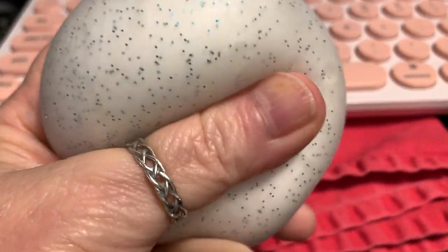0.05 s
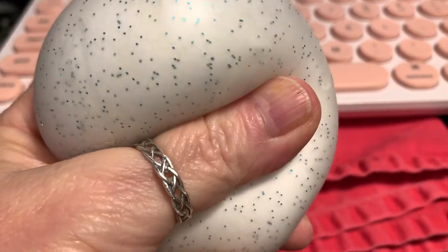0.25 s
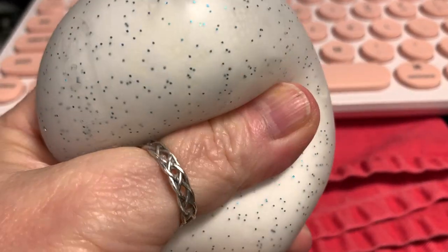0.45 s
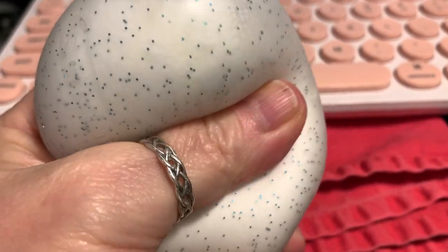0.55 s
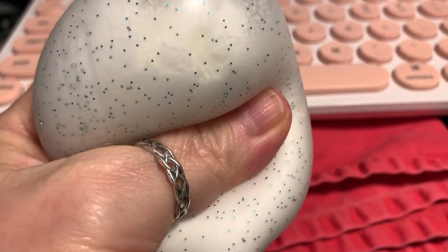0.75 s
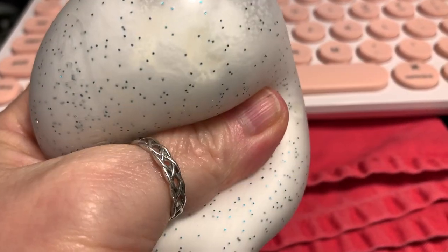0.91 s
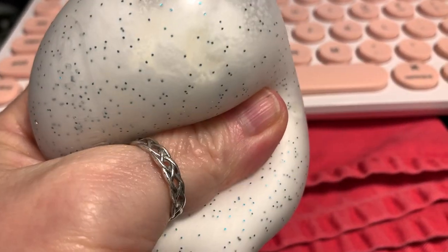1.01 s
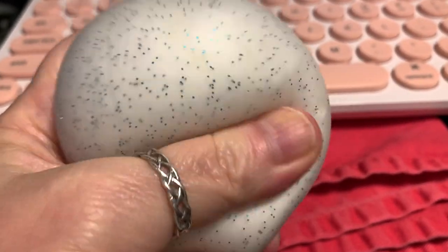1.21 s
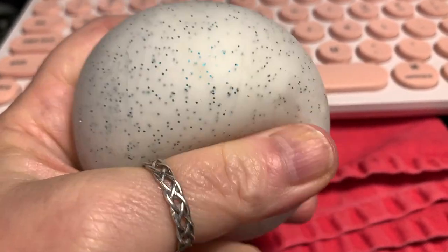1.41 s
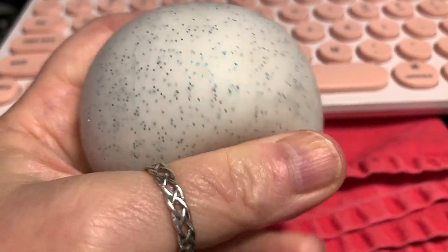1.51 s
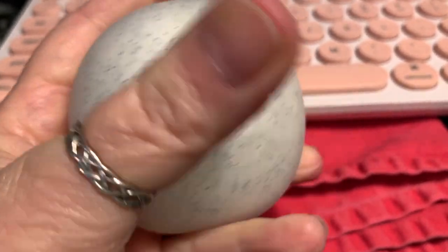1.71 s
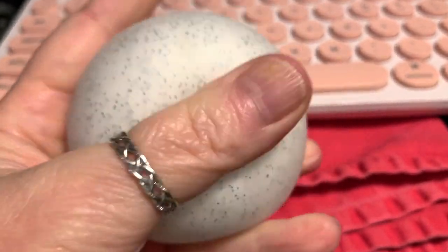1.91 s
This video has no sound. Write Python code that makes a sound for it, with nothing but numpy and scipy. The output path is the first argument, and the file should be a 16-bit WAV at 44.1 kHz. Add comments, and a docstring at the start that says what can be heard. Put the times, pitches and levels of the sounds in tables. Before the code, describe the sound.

A soft rubber stress ball squeezed very close to the microphone in a quiet room: faint rubbing grows into a dense sticky crunch, then a gentle rustle as it swells back, and a low plop.

```python
"""Rubber rubs softly under a thumb in a quiet room: a stress ball, squeezed close to the microphone.
The rub is dense friction grains; then the skin sticks and slips in a crunching run, each slip a flurry
of snaps that the skin smears into a falling chirp. The ball swells back with a soft rustle, the thumb
peels off with a noise tick and a low plop, and the fingers shift. Shaped noise makes the room's rumble and hiss."""
import sys
import numpy as np
from scipy import signal
from scipy.fft import rfft, irfft
from scipy.io import wavfile

SR = 44100
rng = np.random.default_rng(int(sys.argv[2]) if len(sys.argv) > 2 else 0)


def int16_out(signal):
    """Quantize to a 16-bit WAV file."""
    q = np.round(np.clip(np.atleast_2d(signal).T, -1, 1) * 32767)
    wavfile.write(sys.argv[1], SR, q.astype(np.int16))


N = 85995
TIME = np.arange(N) / SR
BLOCK, LEAD_IN = 4096, 256  # samples: length of one short sound, and room before its first snap
BLOCK_TIME = np.arange(BLOCK) / SR
LEVEL_WINDOW_S = 0.01  # a short sound's level counts its energy as if spread over this time


def from_db(db):
    """Decibels to gain."""
    return 10 ** (np.asarray(db) / 20)


def rms_one(x):
    """Scale to unit rms."""
    return x / np.sqrt(np.mean(x ** 2) + 1e-20)


def bins(size):
    """Frequencies of a spectrum [Hz], kept above zero for the logarithm."""
    return np.maximum(np.fft.rfftfreq(size, 1 / SR), 1)


def at_hz(points, hz, axis=1):
    """Read one column of a table on a log-frequency axis."""
    table = np.array(points)
    return np.interp(np.log(hz), np.log(table[:, 0]), table[:, axis])


def colour(x, points, pitch=1):
    """Filter by a spectral curve shifted by a pitch ratio; unit rms."""
    size = x.shape[-1]
    gain = from_db(at_hz(points, bins(size) / pitch))
    return rms_one(irfft(rfft(x) * gain, size))


def high_pass(x, hz, order=2):
    """Remove the bass."""
    return signal.sosfilt(signal.butter(order, hz, "high", fs=SR, output="sos"), x)


def resonate(x, hz, q):
    """Pass through one resonance."""
    return signal.lfilter(*signal.iirpeak(hz, q, fs=SR), x)


def snaps(size, per_s, spread_db):
    """Tiny clicks at random moments, with random sign and uneven size."""
    hits = rng.random(size) < per_s / SR
    signs = rng.choice([-1, 1], size)
    sizes = from_db(spread_db * np.clip(rng.standard_normal(size), -2, 2))
    return hits * signs * sizes


def reflections(x, t60, low_hz):
    """A dying cloud of reflections, different on each side."""
    size = len(x)
    cloud = rng.standard_normal((2, size)) * from_db(-60 * TIME[:size] / t60)
    cloud /= np.sqrt(np.sum(cloud ** 2, axis=1, keepdims=True))
    return signal.fftconvolve(high_pass(x, low_hz)[None], cloud, axes=1)[:, :size]


# tone of the room's rumble and hiss: (frequency [Hz], relative level [dB])
ROOM_TONE = [(25, -7), (42, 3.5), (62, -0.5), (120, 3.5), (180, -6.5), (500, -14), (1000, -25.5),
             (7000, -38), (9300, -28.5), (11600, -42), (13600, -33.5), (16000, -38)]
ROOM_TONE_DB = -59.5  # rms of each stream before the high-pass and the ports


def room_tone():
    """Three independent noise streams: one for the ports, and a left and right pair without bass."""
    air = from_db(ROOM_TONE_DB) * colour(rng.standard_normal((3, N)), ROOM_TONE)
    return ports(air[0]) + high_pass(air[1:], hz=810)


def room_echo(x):
    """The room's faint, quickly dying reverberation."""
    return from_db(-36) * reflections(x, t60=0.19, low_hz=250)


def scattered(x):
    """Reflections off hand and desk: a fresh short cloud, left and right, for each sound given."""
    return from_db(-7) * reflections(x, t60=0.01, low_hz=750)


TRAVEL_S, TRAVEL_POWER = 0.0032, 0.6695  # delay of a 1 kHz skin wave; how steeply lower waves slow


def through_skin(x, travel_s):
    """Bending waves: the treble arrives first and the bass trails, so a click becomes a falling chirp."""
    size = x.shape[-1]
    delay = travel_s * (1000 / np.maximum(bins(size), 60)) ** TRAVEL_POWER
    delay = delay - delay[-1] / 2  # take off half the delay of the highest treble
    phase = 2 * np.pi * np.cumsum(delay) * SR / size  # delay summed over frequency gives phase
    return irfft(rfft(x) * np.exp(-1j * phase), size)


# the two voices of the rubbing: (frequency [Hz], relative level [dB])
MURMUR = [(40, -21.5), (170, -4), (330, 3), (550, 1.5), (950, -5), (1150, -18), (1400, -7.5), (1900, -23.5),
          (4000, -73.5)]
RUSTLE = [(600, -9), (1500, 9), (2500, -0.5), (3400, -0.5), (4800, -7), (6500, -9), (9500, -16),
          (11500, -22), (14000, -21.5), (16000, -30)]
# strokes of hand on rubber in the squeeze, the release and the finger shift:
# (time [s], murmur level [dB], rustle level [dB])
PRESS_RUB = [(.04, -65.5, -106), (.095, -53, -86), (.19, -41, -65.5), (.25, -35.5, -51.5), (.335, -47, -60),
             (.37, -43.5, -50), (.47, -44.5, -50.5), (.63, -41.5, -44), (.69, -33, -37), (.74, -43.5, -36),
             (.79, -51.5, -47.5), (.85, -61.5, -65.5)]
RELEASE_RUB = [(1.05, -102, -81), (1.094, -55, -56), (1.162, -41.5, -49.5), (1.205, -44, -49),
               (1.25, -58.5, -64), (1.325, -56, -63.5), (1.41, -79, -93)]
FINGER_RUB = [(1.65, -58, -84), (1.685, -51.5, -85), (1.76, -76, -99)]
PRESS_PITCH, RELEASE_PITCH, FINGER_PITCH = 0.97, 1.24, 0.483  # shift of the murmur's tone
RUB_GRAINS_PER_S, GRAIN_SPREAD_DB = 4000, 2
GRIT_PER_S, GRIT_SPREAD_DB = 1400, 3.5  # the rustle crackles in fewer, more separate grains
FLUTTER_DB, FLUTTER_PER_S = 1.47, 70  # spread and rate of the random unevenness
LIGHT_DB, FIRM_DB, LIGHT_PITCH = -49.5, -38, 0.85  # a light touch murmurs duller than a firm one


def rubbing(stroke, pitch):
    """Dense, fluttering friction grains from two patches of skin under the sliding hand."""
    s, *levels = np.transpose(stroke)
    murmur_db, rustle_db = (np.interp(TIME, s, db, left=-np.inf, right=-np.inf) for db in levels)
    firm = np.interp(murmur_db, [LIGHT_DB, FIRM_DB], [0, 1])
    wander = np.interp(TIME * FLUTTER_PER_S, np.arange(BLOCK), rng.standard_normal(BLOCK))
    flutter = from_db(FLUTTER_DB * wander)
    grains = snaps((2, N), RUB_GRAINS_PER_S, GRAIN_SPREAD_DB) * flutter
    chirps = through_skin(grains, TRAVEL_S)
    firm_murmur = firm * colour(chirps, MURMUR, pitch)
    light_murmur = (1 - firm) * colour(chirps, MURMUR, pitch * LIGHT_PITCH)
    crackle = snaps((2, N), GRIT_PER_S, GRIT_SPREAD_DB) * flutter
    rustle = from_db(rustle_db) * colour(crackle, RUSTLE)
    # one patch is heard directly, the other only by its reflections
    facing, hidden = from_db(murmur_db) * (firm_murmur + light_murmur) + rustle
    return np.vstack([facing, scattered(hidden)])


def add(out, s, x, db):
    """Place a short sound as rows (direct, scattered left, scattered right); db sets the direct row."""
    start = int(s * SR)
    x = rms_one(x) * from_db(db) * np.sqrt(LEVEL_WINDOW_S * SR / BLOCK)
    out[:, start:start + BLOCK] += np.vstack([x, scattered(x)])[:, :N - start]


FIRST_SNAP = 1.94  # weight of the snap that opens a slip or a plop
# tone of the plop and of the tick: (frequency [Hz], relative level [dB])
PLOP_TONE = [(30, -26), (70, 12.5), (130, 6), (400, 4), (650, -15), (1100, -32.5), (1500, -16.5),
             (5000, -84)]
TICK_TONE = [(2000, -12), (4500, -20.5), (6500, -2.5), (9000, -0.5), (11500, -5), (14000, 1), (16000, -3)]
# plops of freed skin, and ticks of skin unsticking around the first plop: (time [s], level [dB])
PLOPS = [(1.6092, -37.5), (1.674, -49), (1.697, -51), (1.815, -57), (1.858, -64)]
TICKS = [(1.6005, -56), (1.608, -46.5)]
TICK_FADE_S, PLOP_TRAVEL_S = 0.0018, 0.004  # the plop's travel time is also the fade of its snaps


def peels():
    """The thumb unsticks with swelling ticks; freed skin springs back with a rough low chirp."""
    out = np.zeros((3, N))
    for s, db in PLOPS:
        kick = snaps(BLOCK, GRIT_PER_S, GRIT_SPREAD_DB) * np.exp(-BLOCK_TIME / PLOP_TRAVEL_S)
        kick[0] += FIRST_SNAP
        chirp = through_skin(np.roll(kick, LEAD_IN), PLOP_TRAVEL_S)
        add(out, s - LEAD_IN / SR, colour(chirp, PLOP_TONE), db)
    middle = BLOCK / SR / 2
    for s, db in TICKS:
        swell = np.exp(-np.abs(BLOCK_TIME - middle) / TICK_FADE_S)
        tick = rng.standard_normal(BLOCK) * swell
        add(out, s - middle, colour(tick, TICK_TONE), db)
    return out


SNAPS_PER_S, SNAP_SPREAD_DB = 3000, 6  # tiny snaps within a slip
CATCH_SNAP = 2.64  # weight of the snap that closes a 10 ms slip
TRAVEL_SPREAD, NEAR_TRAVEL_S = 0.156, 0.000577  # log spread of the thud's travel; travel of the crack
THUD_Q, LATE_THUD_Q = 1.65, 3.6  # the slipping patch rings more hollow once the squeeze has ended
RING_HZ, RING_Q, RING_GAIN = 3520, 8, 1.5  # ring of the brightest slips, before the spread between spots
RING_SPREAD = 0.08  # log spread of the ring's pitch from spot to spot
DULL_SIZZLE_DB, BRIGHT_SIZZLE_DB = -23, -8.5  # relative to the crack: early and late slips sizzle little
DULL_PITCH = 0.87  # dull slips crack lower
# the three voices of the skin: (frequency [Hz], relative level [dB])
BODY = [(30, -15.5), (65, 18.5), (220, 4), (350, 3.5), (620, 5), (800, -1), (960, 4.5), (1150, -10),
        (1330, 5.5), (1700, -7.5), (3500, -25)]
CRACK = [(400, -1.5), (1100, -2.5), (1900, -1), (2700, -2.5), (3500, -3.5), (4300, -7.5), (5300, -11.5),
         (6600, -35.5), (10000, -69)]
SIZZLE = [(3000, -30.5), (6000, 10), (8000, 5.5), (9900, 2), (11500, -6.5), (14000, -30), (16000, -17)]
# brightness of the slips over the run: (time [s], brightness [0 dull to 1 bright])
BRIGHTNESS = [(.3, 0), (.42, 0.53), (.56, 1), (.77, 0.75), (.9, 0.21)]
# slips of the skin:
# (time [s], length [s], body level [dB], crack level [dB], resonance of the thud [Hz])
SLIPS = [(0.254, 0.0011, -32, -54.5, 480), (0.283, 0.01, -32.5, -42, 493), (0.306, 0.0085, -34, -46.5, 690),
         (.332, 0.00092, -51.5, -55, 480), (0.348, .005, -32, -41.5, 580), (0.355, 0.0091, -29, -44.5, 304),
         (.377, 0.0073, -28.5, -40, 312), (0.397, 0.0055, -28.5, -47, 660), (0.404, 0.0087, -29, -38, 380),
         (.426, 0.00096, -26, -40, 530), (0.449, 0.0067, -27, -38, 306), (0.486, 0.00092, -45.5, -41, 700),
         (0.4931, .0018, -27.5, -37, 574), (.506, 0.00065, -25.5, -37.5, 570),
         (.514, .005, -28.5, -35, 485), (0.5245, 0.0018, -33, -40, 556), (0.532, .0051, -28, -34.5, 640),
         (0.547, 0.0074, -34.5, -31.5, 437), (0.561, 0.0057, -25.5, -33, 498),
         (0.5747, 0.0054, -36, -34.5, 697), (.589, .0044, -30.5, -33.5, 650),
         (0.6035, 0.0062, -28, -33.5, 459), (0.6203, 0.0063, -24.5, -30.5, 507),
         (.642, 0.0064, -24.5, -34, 670), (.664, 0.0041, -37, -35.5, 790), (.676, 0.0053, -27, -32, 330),
         (0.694, 0.01, -27.5, -31, 350), (0.709, 0.0049, -31, -35, 715), (0.723, 0.0057, -29.5, -28.5, 468),
         (0.737, 0.0026, -33.5, -34.5, 547), (0.75, 0.0043, -33, -33.5, 740), (.768, .002, -36.5, -27, 390),
         (0.7985, 0.0034, -42.5, -39, 830), (0.897, 0.0032, -48, -58.5, 814),
         (0.936, 0.00136, -43, -56, 840), (0.9631, 0.00077, -64.5, -51, 590)]


def slips():
    """Skin snaps loose, skids in smaller snaps and catches: a chirping thud, a ringing crack and sizzle."""
    out = np.zeros((3, N))
    for s, length, body_db, crack_db, thud_hz in SLIPS:
        bright = np.interp(s, *np.transpose(BRIGHTNESS))
        skid = np.exp(-(BLOCK_TIME / length) ** 4)
        flurry = snaps(BLOCK, SNAPS_PER_S, SNAP_SPREAD_DB) * skid
        flurry[0] += FIRST_SNAP
        flurry[int(length * SR)] -= CATCH_SNAP * np.sqrt(length / 0.01)
        flurry = np.roll(flurry, LEAD_IN)
        start = s - LEAD_IN / SR
        far, spot = np.exp(rng.standard_normal(2) * [TRAVEL_SPREAD, RING_SPREAD])

        q = LATE_THUD_Q if s > PRESS_RUB[-1][0] else THUD_Q
        thud = resonate(through_skin(flurry, TRAVEL_S * far), thud_hz, q)
        add(out, start, colour(thud, BODY), body_db)

        near = through_skin(flurry, NEAR_TRAVEL_S)
        pitch = DULL_PITCH ** (1 - bright)
        ring = resonate(near, RING_HZ * pitch * spot, RING_Q)
        add(out, start, colour(near + RING_GAIN * ring, CRACK, pitch), crack_db)

        sizzle_db = crack_db + DULL_SIZZLE_DB * (1 - bright) + BRIGHT_SIZZLE_DB * bright
        add(out, start, colour(near, SIZZLE), sizzle_db)
    return out


# the two microphone ports: (frequency [Hz], phase lead of left [rad], left minus right level [dB])
PORTS = [(400, 0, 0), (660, .3, 2.5), (790, -.3, 3.5), (1250, 1.6, 4), (1700, 3.2, -3), (2900, 6.2, 4),
         (3500, 7.1, 0), (5000, 7.1, 0), (6100, 8.8, -7), (7400, 8.9, 0), (9500, 6.3, 0), (13500, 0, 0)]


def ports(x):
    """A near sound reaches the two ports with different phase and level; their total power is kept."""
    hz = bins(2 * N)
    lead = np.exp(1j * at_hz(PORTS, hz))
    tilt = from_db(at_hz(PORTS, hz, axis=2))
    sides = np.array([tilt, 1 / lead]) * np.sqrt(2 / (1 + tilt ** 2))
    return irfft(rfft(x, 2 * N) * sides)[:, :N]


def scene():
    """The room's rumble and hiss, and the ball with its reflections."""
    rubs = rubbing(PRESS_RUB, PRESS_PITCH) + rubbing(RELEASE_RUB, RELEASE_PITCH)
    rubs += rubbing(FINGER_RUB, FINGER_PITCH)
    ball = rubs + peels() + slips()
    direct, reflected = ball[0], ball[1:]
    return room_tone() + room_echo(direct) + reflected + ports(direct)


def record(dry):
    """A steep low-pass cuts the top: 70 dB down from 16.8 kHz."""
    return signal.sosfilt(signal.cheby2(14, 70, 16800, fs=SR, output="sos"), dry)


dry = scene()
out = record(dry)
int16_out(out)
```